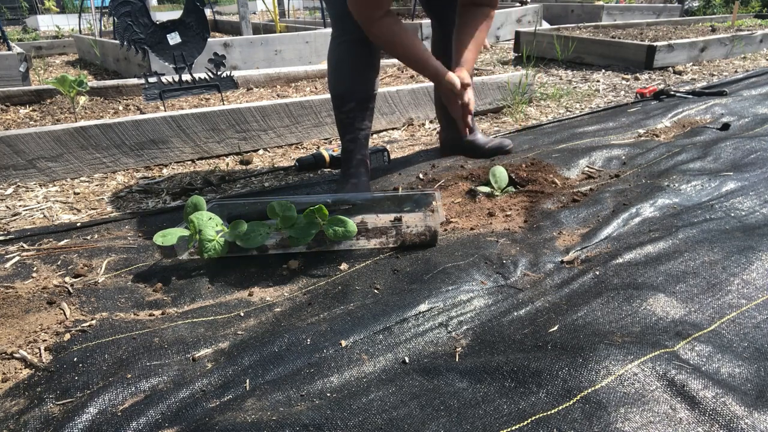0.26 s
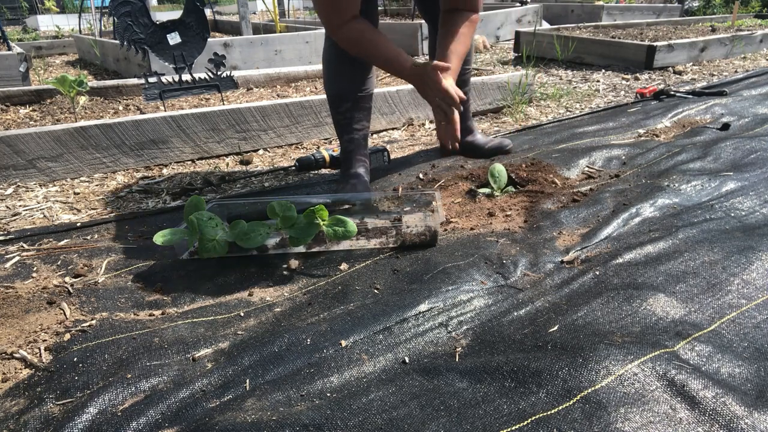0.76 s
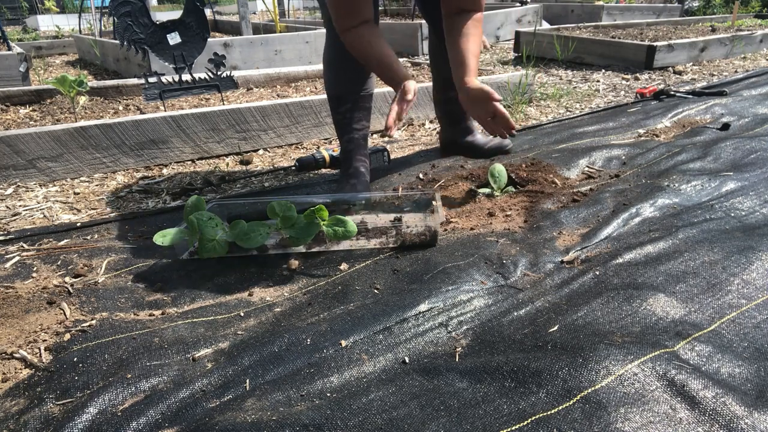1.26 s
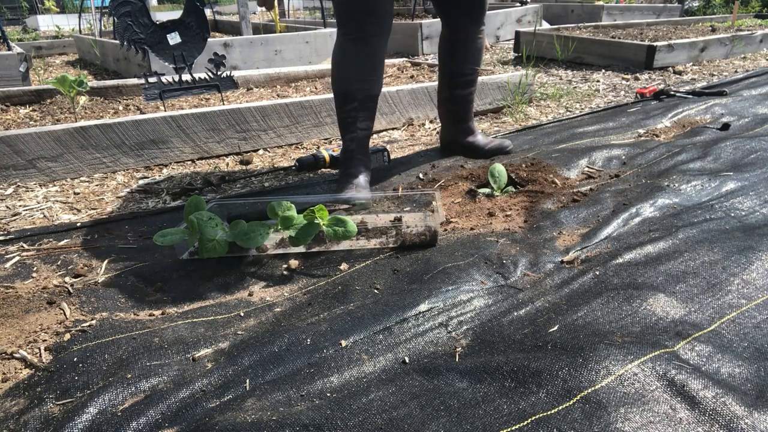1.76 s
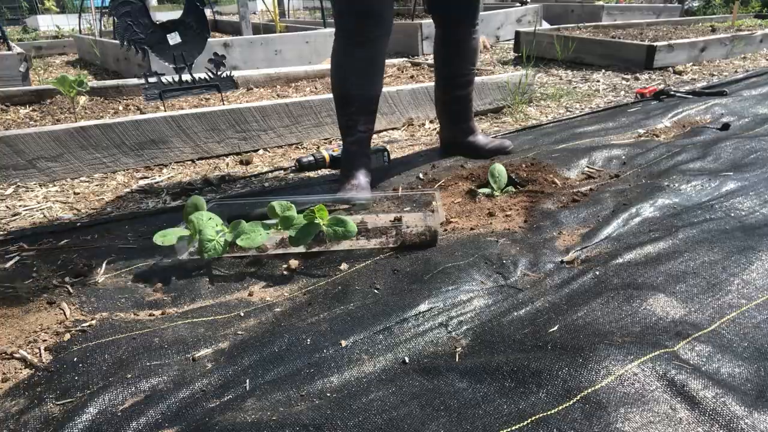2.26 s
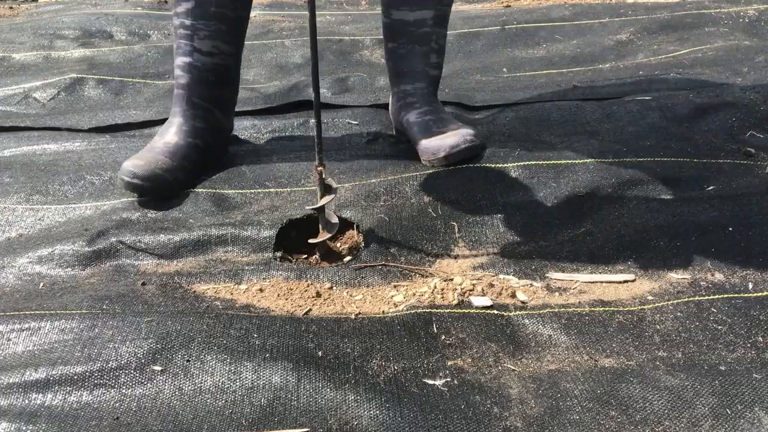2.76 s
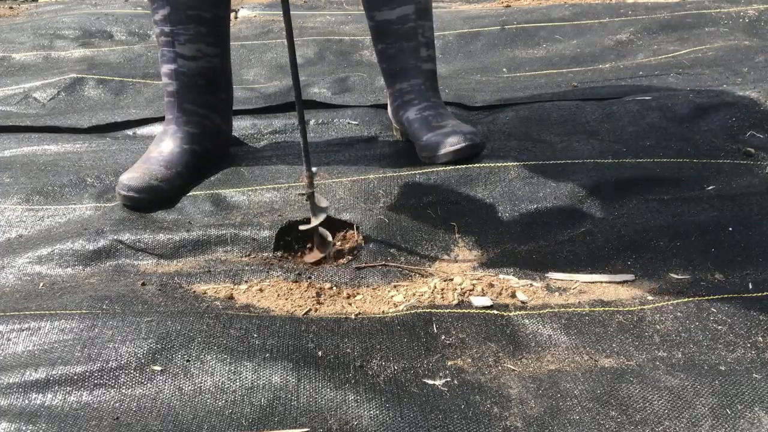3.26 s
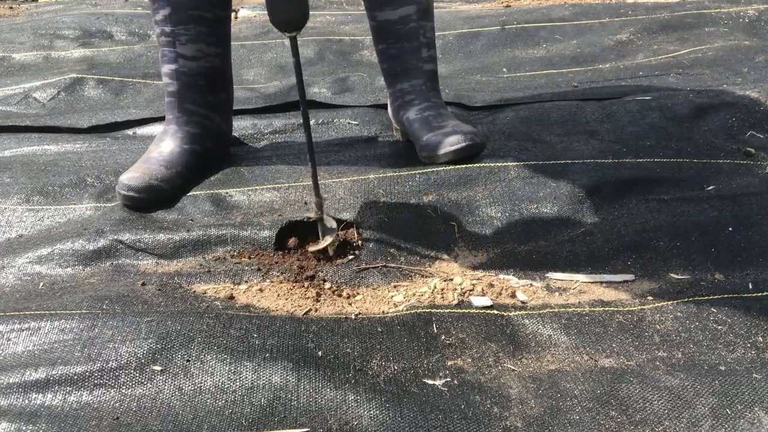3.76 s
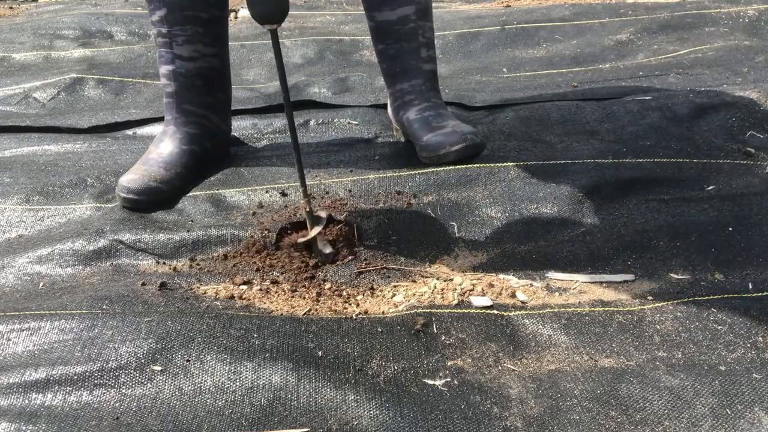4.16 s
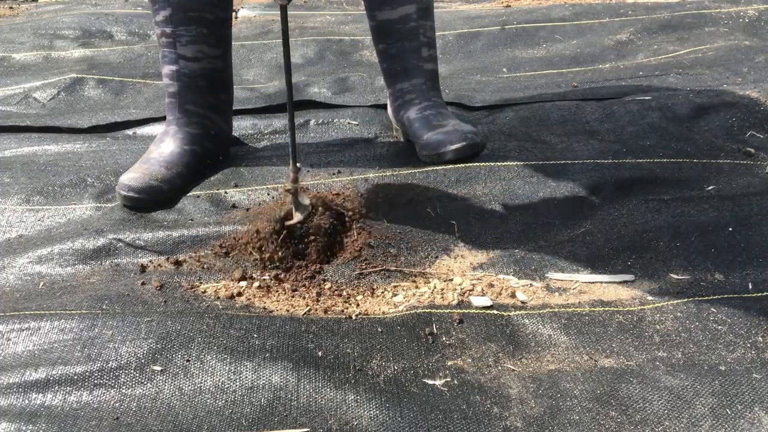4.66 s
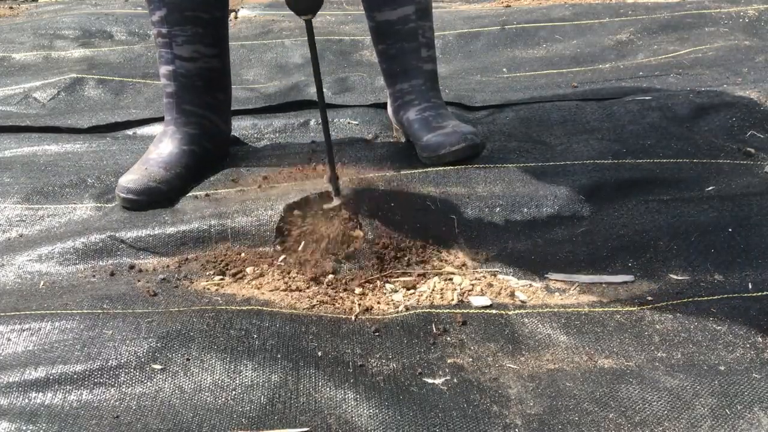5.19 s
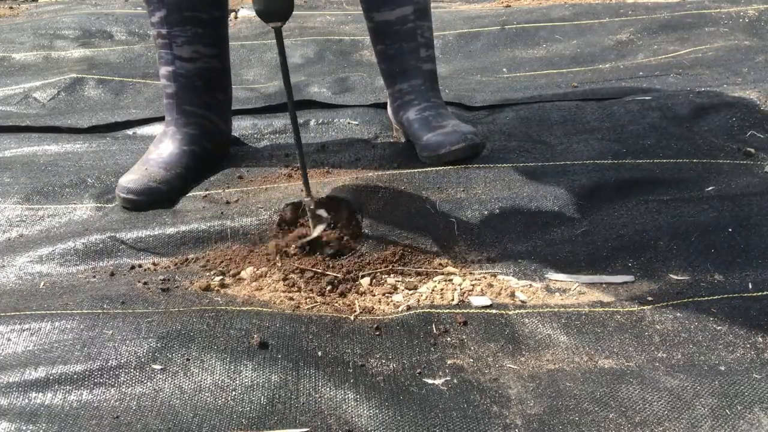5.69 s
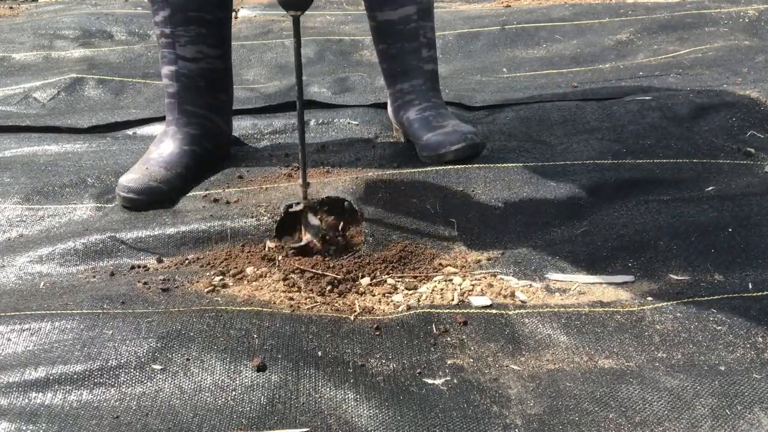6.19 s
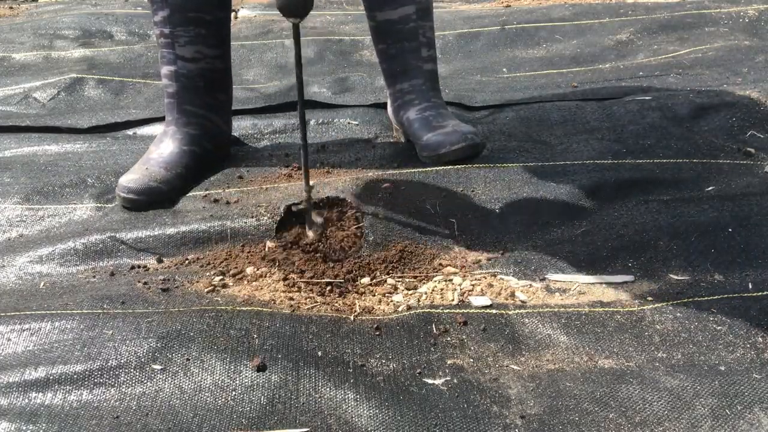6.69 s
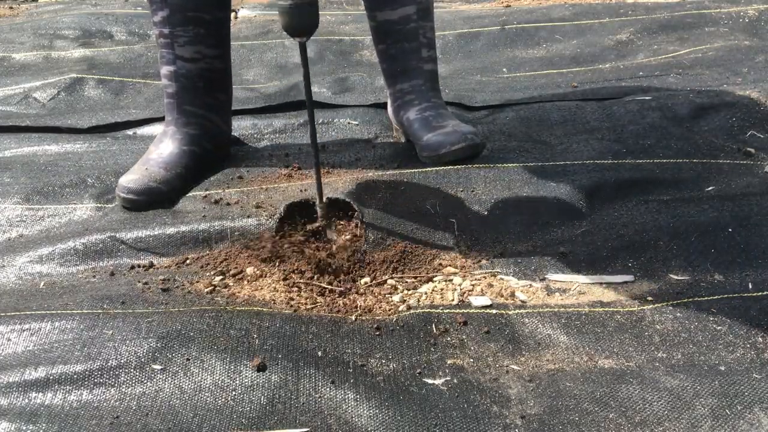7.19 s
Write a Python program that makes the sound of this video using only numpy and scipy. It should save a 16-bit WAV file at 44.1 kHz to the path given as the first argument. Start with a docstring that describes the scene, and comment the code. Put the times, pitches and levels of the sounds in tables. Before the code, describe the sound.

Quiet garden with far engine revs, gritty hand rubbing and one sharp clap, then a loud whining drill auger scrapes and clatters through stony ground.

```python
"""A cordless drill spins an auger through ground fabric into stony soil: shaft-locked tones whose whine sags
under load, filtered clicks for gear rattle and grinding, slip bursts for bites, pulses for stones and clods.
Before it, someone rubs soil off their hands (filtered grit strokes) and claps once (coloured pulses).
Behind: a far two-stroke engine revs (exhaust harmonics), a bird sings (gliding sines), the yard hushes (noise)."""
import sys
import numpy as np
from scipy import signal
from scipy.fft import rfft, irfft
from scipy.io import wavfile
from scipy.ndimage import uniform_filter1d

SR = 44100
rng = np.random.default_rng(int(sys.argv[2]) if len(sys.argv) > 2 else 0)


def store_pcm(level_fs):
    """Save levels as 16-bit WAV."""
    pcm = np.round(np.clip(level_fs, -1, 1) * 32767).astype(np.int16)
    wavfile.write(sys.argv[1], SR, np.atleast_2d(pcm).T)


N = 328104
T = np.arange(N) / SR
HZ = np.fft.rfftfreq(N, 1 / SR)


def amp(db):
    """Decibels to gain."""
    return 10 ** (np.asarray(db) / 20)


def unit(x):
    """Scales to rms 1."""
    return x / np.sqrt(np.mean(x ** 2) + 1e-20)


def read(points, hz):
    """A spectrum's dB at these frequencies, interpolated on a log axis."""
    point_hz, db = np.transpose(points)
    return np.interp(np.log(hz + 1), np.log(point_hz + 1), db)


def curves(rows):
    """Each column of a timed table, at every sample."""
    time_s, *columns = np.transpose(rows)
    return [np.interp(T, time_s, column) for column in columns]


def add(mix, start_s, sound):
    """Lays a sound into the mix at its start time."""
    part = mix[max(round(start_s * SR), 0):][:len(sound)]
    part += sound[:len(part)]


def ramp(start_s, rise_s):
    """Rises from 0 to 1, starting at start_s."""
    return np.clip((T - start_s) / rise_s, 0, 1)


def lag(x, seconds):
    """Follows x with this time constant, starting at its first value."""
    r = np.exp(-1 / (seconds * SR))
    return x[0] + signal.lfilter([1 - r], [1, -r], x - x[0])


def wander(rate_hz):
    """Smooth chance of rms 1, up to about this rate."""
    count = N // 32 + 1
    hz = np.fft.rfftfreq(count, T[-1] / count)
    spectrum = rfft(rng.standard_normal(count)) / (1 + (hz / rate_hz) ** 4)
    slow = unit(irfft(spectrum, count))
    return np.interp(T, np.linspace(0, T[-1], count), slow)


def colour(x, db):
    """Minimum-phase filter with this gain shape on the HZ grid; white noise keeps its power."""
    log_gain = np.log(unit(amp(db)))
    mirrored = np.r_[log_gain, log_gain[-2:0:-1]]
    phase = -signal.hilbert(mirrored).imag[:len(HZ)]
    taps = irfft(np.exp(log_gain + 1j * phase))[:4096]
    return signal.oaconvolve(x, taps)[:len(x)]


def resonate(x, hz, width_hz):
    """A resonance of gain 1 that may follow a frequency curve."""
    turn = np.exp(2j * np.pi * np.cumsum(hz * np.ones(len(x))) / SR)
    r = np.exp(-np.pi * width_hz / SR)
    return 2 * (turn * signal.lfilter([1 - r], [1, -r], x / turn)).real


def hiss_band(hz, width_hz):
    """A narrow band of noise, rms 1, that may follow a frequency curve."""
    noise = rng.standard_normal(N)
    return unit(resonate(resonate(noise, hz, width_hz), hz, width_hz))


def grains(per_s, spread_db):
    """Random clicks of rms 1, most small and a few large."""
    size = amp(spread_db * np.minimum(rng.exponential(1, N), 4))
    sign = rng.choice([-1, 1], N)
    return unit(size * sign * (rng.random(N) < per_s / SR))


def clicks(rows, spectrum, fuzz):
    """Blows (start_s, peak_db, t60_s): a sharp pulse and a short rough tail, in one colour."""
    out, t = np.zeros(N), np.arange(4096) / SR
    for start_s, peak_db, t60_s in rows:
        tail = fuzz * rng.standard_normal(len(t)) * amp(-60 * t / t60_s)
        add(out, start_s, amp(peak_db) * ((t == 0) + tail))
    pulse = colour(1. * (t == 0), read(spectrum, HZ))
    return colour(out, read(spectrum, HZ)) / abs(pulse).max()


def whistles(rows, blur_rad):
    """Short gliding tones with an unsteady phase."""
    out, jitter = np.zeros(N), blur_rad * wander(250)
    for start_s, length_s, start_hz, end_hz, level_db in rows:
        u = np.linspace(0, 1, int(length_s * SR))
        glide_hz = start_hz + u * (end_hz - start_hz)
        phase = 2 * np.pi * np.cumsum(glide_hz) / SR + jitter[int(start_s * SR):][:len(u)]
        add(out, start_s, amp(level_db) * np.sqrt(2) * np.sin(np.pi * u) * np.sin(phase))
    return out


def scatter(x, wet_db, t60_s):
    """Raised beds and fences throw back a faint, short tail."""
    t = np.arange(SR // 3) / SR
    tail = rng.standard_normal(len(t)) * amp(-60 * t / t60_s) * (t > .006)
    return x + amp(wet_db) * signal.oaconvolve(x, tail / np.linalg.norm(tail))[:N]


# outdoor hush spectrum: freq_hz, relative_db_per_hz
YARD_SPECTRUM = [(25, -19.5), (45, -12), (65, -6), (105, -0.5), (170, -5.5), (280, -7), (420, -9.5),
                 (620, -14), (850, -11.5), (1350, -10.5), (2500, -17), (4500, -18.5), (7500, -25),
                 (8600, -30.5), (15500, -33.5)]
YARD_DB = -51


def yard():
    """The steady outdoor hush: coloured noise, swelling a little."""
    hush = unit(colour(rng.standard_normal(N), read(YARD_SPECTRUM, HZ)))
    return amp(YARD_DB + 1.3 * wander(4.6)) * hush


# throttle openings: start_s, length_s, target_firing_hz, target_level_db
THROTTLE = [(0.029, 0.53, 193, -47), (0.708, .18, 192, -46), (1.035, .22, 181, -47), (1.39, 0.61, 187, -47)]
# exhaust gain by harmonic frequency: freq_hz, gain_db
EXHAUST_GAIN = [(120, -6), (175, -1.5), (230, -9), (285, 0.5), (325, -12.5), (370, -8.5), (480, -42),
                (700, -21), (900, -24), (1300, -28)]
IDLE_HZ, IDLE_DB = 104.3, -62  # firing rate and level with the throttle shut
FLYWHEEL_S, EXHAUST_LAG_S = .16, .035  # lags of speed and loudness behind the throttle


def far_engine():
    """Speed and loudness chase the throttle; only the low exhaust harmonics carry across the gardens."""
    aim_hz, push = np.full(N, float(IDLE_HZ)), np.full(N, amp(IDLE_DB))
    for start_s, length_s, target_hz, target_db in THROTTLE:
        is_open = (T > start_s) & (T < start_s + length_s)
        aim_hz[is_open], push[is_open] = target_hz, amp(target_db)
    firing_hz = lag(aim_hz, FLYWHEEL_S)
    turn = 2 * np.pi * np.cumsum(firing_hz * (1 + 0.005 * wander(25))) / SR
    stack = np.zeros(N)
    for k in range(1, 8):
        # moving air fades each harmonic on its own
        gain_db = read(EXHAUST_GAIN, k * firing_hz) + 1.5 * wander(10)
        stack += amp(gain_db) * np.sin(k * turn)
    return np.sqrt(2) * lag(push, EXHAUST_LAG_S) * stack


# bird notes: start_s, length_s, start_hz, end_hz, level_db (before BIRD_TRIM_DB)
BIRD_NOTES = [(1.229, 0.11, 4300, 4900, -66), (1.649, 0.045, 4470, 4040, -60),
              (1.86, 0.047, 4270, 5460, -64), (1.93, 0.066, 4200, 4980, -54),
              (2.05, 0.078, 4400, 5970, -55), (2.12, .08, 6060, 3900, -51), (2.26, 0.11, 4600, 3200, -53),
              (2.5, 0.087, 5870, 4300, -55)]
BIRD_TRIM_DB = -5


def bird():
    """Each note is one gliding, slightly blurred sine."""
    return amp(BIRD_TRIM_DB) * whistles(BIRD_NOTES, blur_rad=0.75)


# palms slide over each other: start_s, length_s, level_db, hollow_hz
PALM_RUBS = [(.35, 0.11, -51, 4500), (0.456, 0.062, -42.5, 3900), (0.517, 0.049, -54, 4000),
             (0.568, 0.058, -41.5, 3650), (0.619, 0.042, -44, 2880), (0.668, .1, -44, 2700),
             (0.783, .095, -45, 3440), (0.886, .09, -41.5, 2600), (0.992, 0.12, -43, 2810)]
# rub spectrum: freq_hz, relative_db_per_hz
SKIN_SPECTRUM = [(300, -24), (1500, -9), (2500, -5), (4000, -1.5), (7500, -2), (9000, -5.5), (15500, -6)]
# palms meet: start_s, peak_db, t60_s
PALM_CLAPS = [(.343, -31, 0.027), (1.445, -11.5, 0.018), (1.4473, 6.5, 0.0043), (1.4515, -14, .014),
              (1.516, -40, 0.027)]
# clap spectrum: freq_hz, relative_db_per_hz
CLAP_SPECTRUM = [(100, -37), (280, 0.5), (480, -7), (750, -9.5), (1300, -3), (1950, 3), (2400, -5),
                 (2750, 1.5), (3450, -7), (3850, -2), (4750, -17), (5500, -8), (6100, -17), (7250, -4.5),
                 (8580, -16), (15500, -27.5)]


def hands():
    """Gritty palms hiss unevenly through the hollow between them, then clap."""
    hiss, grit = np.zeros(N), grains(9000, 1.5) * amp(2.2 * wander(70))
    for start_s, length_s, level_db, hollow_hz in PALM_RUBS:
        n = int(length_s * SR)
        swell = np.sin(np.pi * np.arange(n) / n) ** 0.74
        stroke = grit[int(start_s * SR):][:n] * swell
        add(hiss, start_s, amp(level_db) * (stroke + 0.75 * resonate(stroke, hollow_hz, 450)))
    claps = clicks(PALM_CLAPS, CLAP_SPECTRUM, fuzz=.3)
    return colour(hiss, read(SKIN_SPECTRUM, HZ)) + claps


# drill speed heard as gear whine: time_s, whine_hz, whine_db, octave_db (levels before trims and load)
MOTOR_CURVE = [(2.95, 3021, -29, -46), (2.97, 2936, -54, -49), (3.25, 3057, -25.5, -36),
               (3.82, 2927, -26, -38), (3.87, 2653, -23, -29), (4.07, 2782, -28, -32),
               (4.15, 2735, -21, -22.5), (4.45, 2568, -19, -23.5), (4.96, 2701, -27.5, -47),
               (4.99, 2684, -13.5, -28), (5.18, 2495, -17, -35), (5.48, 2591, -23.5, -25),
               (5.84, 2562, -20, -26), (6.34, 2688, -25.5, -39), (6.39, 2787, -31, -42),
               (6.49, 2685, -22.5, -46), (6.64, 2344, -24, -26), (6.85, 2673, -25, -50),
               (6.99, 2736, -22, -24), (7.1, 2520, -20.5, -32), (7.31, 2730, -36, -27),
               (7.44, 2660, -20, -28)]
FREE_HZ, LOADED_HZ = 3050, 2540  # whine at no load and at full load


def load():
    """How hard the drill works, read from the sag of its speed: 0 free, 1 at full load."""
    return np.clip((FREE_HZ - curves(MOTOR_CURVE)[0]) / (FREE_HZ - LOADED_HZ), 0, 1)


# the auger meets the ground; the drill is CLEAR_DB quieter before
TOUCH_S, TOUCH_RISE_S, CLEAR_DB = 2.847, 0.14, -27.5


def contact():
    """Gain that swells as the auger meets the ground."""
    return amp(CLEAR_DB * (1 - ramp(TOUCH_S, TOUCH_RISE_S)))


# soil thump spectrum, for clods and jolts: freq_hz, relative_db_per_hz
EARTH_SPECTRUM = [(25, -43), (60, -8), (130, 4), (260, -0.5), (450, 6), (700, -9), (2000, -34), (8000, -62)]
# stones click on the steel: start_s, peak_db
STONE_HITS = [(2.879, -13), (3.4493, 6), (3.8094, 0), (6.0026, 4), (6.095, -3), (6.3814, 2.5), (6.519, 6),
              (6.5353, 10), (7.188, 4), (7.4114, 2)]
# stone and grit spectrum: freq_hz, relative_db_per_hz
STONE_SPECTRUM = [(100, -41), (700, -12), (2500, 8.5), (5500, 5), (8000, 5), (15000, -5.5)]
# clods land on the fabric: start_s, peak_db
CLOD_HITS = [(5.235, -33), (5.289, -25.5), (5.345, -32), (5.41, -27)]
STONE_T60_S, CLOD_T60_S = .008, 0.036
GRIT_DB, GRIT_LOAD_DB = -40, 3  # level at no load, and what full load adds


def stones():
    """Stones click on the auger, and thrown grit and clods patter on the fabric."""
    hits = clicks([(s, db, STONE_T60_S) for s, db in STONE_HITS], STONE_SPECTRUM, fuzz=0.12)
    clods = clicks([(s, db, CLOD_T60_S) for s, db in CLOD_HITS], EARTH_SPECTRUM, fuzz=.15)
    grit = amp(GRIT_DB + GRIT_LOAD_DB * load()) * colour(grains(120, 1.2), read(STONE_SPECTRUM, HZ))
    return hits + clods + grit * contact() * (T > TOUCH_S)


# steel against stone: start_s, length_s, start_hz, end_hz, level_db
STEEL_SQUEALS = [(2.952, 0.063, 2244, 4150, -21.5), (4.97, 0.17, 3070, 2940, -23),
                 (6.09, 0.01, 12300, 12100, -16.5)]


def squeals():
    """The steel squeals briefly against a stone: gliding, blurred sines."""
    return whistles(STEEL_SQUEALS, blur_rad=0.57)


# the flight catches on stones and fabric: start_s, length_s, scrape_db, thud_db
FLIGHT_BITES = [(2.809, .008, -31, -34), (2.891, 0.0054, -21, -31), (3.798, 0.036, -17.5, -24),
                (3.87, 0.032, -21, -24), (3.95, 0.042, -23, -43), (4.204, 0.026, -20.5, -40),
                (4.258, 0.023, -23, -38), (4.313, .029, -17, -35), (5.84, 0.04, -31, -25.5),
                (5.891, .021, -14.5, -21.5), (5.94, .015, -15, -19.5), (6.051, .02, -17.5, -28.5),
                (6.457, 0.0099, -12, -23), (6.47, 0.037, -19.5, -23), (6.516, .022, -9, -16),
                (6.704, .02, -8, -14), (6.928, .007, -11, -19.5), (6.936, .014, -7.5, -16.5),
                (7.2, 0.0057, -21, -13), (7.219, 0.017, -14.5, -21), (7.379, .021, -16.5, -27),
                (7.394, 0.0072, -6.5, -11.5), (7.425, .021, -10.5, -17)]
# scrape spectrum: freq_hz, relative_db_per_hz
SCRAPE_SPECTRUM = [(30, -35), (80, -20), (400, -8.5), (600, -19), (1500, 5.5), (2200, 0), (2750, 6),
                   (3400, -7), (5300, -3.5), (7500, -12), (9000, -18), (15000, -16)]
HOLE_HZ, HOLE_WIDTH_HZ = 918, 410  # ring of the hole
JOLT_DB, JOLT_T60_S = -6.5, 0.069  # jolt peak re the thud, and decay


def bites():
    """Each catch is a burst of slips that scrapes the steel, thumps the hole and jolts the ground."""
    scrape, thud, slips = np.zeros(N), np.zeros(N), grains(3500, 1.9)
    jolts = []
    for start_s, length_s, scrape_db, thud_db in FLIGHT_BITES:
        n = int(length_s * SR)
        slip = unit(slips[int(start_s * SR) - n:][:n]) * signal.windows.tukey(n, .4)
        burst = np.pad(slip, (0, 1024))  # room for the ring
        ring = resonate(resonate(burst, HOLE_HZ, HOLE_WIDTH_HZ), HOLE_HZ, HOLE_WIDTH_HZ)
        add(scrape, start_s, amp(scrape_db) * burst)
        add(thud, start_s, amp(thud_db) * ring * np.std(burst) / np.std(ring))
        jolts.append((start_s + length_s / 2, thud_db + JOLT_DB, JOLT_T60_S))
    return colour(scrape, read(SCRAPE_SPECTRUM, HZ)) + thud + clicks(jolts, EARTH_SPECTRUM, fuzz=0.088)


SLOTS = 9  # whine cycles per shaft turn
GEAR_RATIO = 19  # shaft turns per auger turn
FADE_IN_S, FADE_IN_RISE_S = 2.682, .11  # the drill, its shaft already at speed, fades in
DIG_S, DIG_RISE_S = 3.78, 0.12  # flight breaks through the fabric and digs in
# with slack gears, each auger turn swings the speed (share) and, in the soil, the whine level
SLACK_WOBBLE, SLACK_FLUTTER_DB = 0.0097, 4.5


def whine(mesh, shaft, auger, effort, digging):
    """Gear mesh tone and its octave, roughened by backlash."""
    _, whine_db, octave_db = curves(MOTOR_CURVE)
    once_per_turn = 1 + 0.15 * np.sin(shaft)
    tone = amp(whine_db + 0.73) * np.sin(mesh) * amp(1.9 * wander(83.0)) * once_per_turn
    octave = np.sin(2 * mesh + 0.32 * wander(90)) * amp(2.0 * wander(120.4))
    tone += amp(octave_db + 0.3) * octave
    return tone * amp(SLACK_FLUTTER_DB * digging * np.sqrt(1 - effort) * (auger - 0.9))


# shaft and gear tones: shaft_multiple, free_db, digging_db (both re the gear rattle)
SHAFT_TONES = [(2.704, -47, -23), (9.8, -28, -25), (11.65, -33, -36), (13.02, -35, -29), (15.74, -28, -24),
               (21, -31, -29), (24.6, -20, -30), (27.4, -20, -33), (30.1, -33, -38), (36.4, -31, -44)]
# gear tones that sing out for a while: start_s, length_s, shaft_multiple, level_db
SINGING_GEARS = [(3.104, 0.49, 10, -29.5), (4.545, 0.39, 31, -31), (4.75, .8, 5.25, -29.5),
                 (4.949, .3, 27, -39), (6.85, 0.6, 11.65, -27.5)]


def gear_tones(shaft, rattle_db, digging):
    """Sines locked to multiples of the shaft rate, each wavering in level and phase."""
    tones = np.zeros(N)
    for k, free_db, dig_db in SHAFT_TONES:
        level_db = rattle_db + free_db + (dig_db - free_db) * digging + 2.35 * wander(5.9)
        tones += amp(level_db) * np.sin(k * shaft + 0.86 * wander(60))
    for start_s, length_s, k, level_db in SINGING_GEARS:
        swell = np.sqrt(np.maximum(1 - (2 * (T - start_s) / length_s - 1) ** 2, 0))
        tones += amp(level_db) * swell * np.sin(k * shaft + 0.42 * wander(38))
    return tones


# gear rattle spectrum: freq_hz, relative_db_per_hz
RATTLE_SPECTRUM = [(40, -58), (900, -25.5), (1800, -10.5), (2400, 1.5), (3300, -1), (5000, -1.5),
                   (7900, -5), (8300, -5.5), (11000, -8.5), (15800, -6)]
# case resonances: freq_hz, width_hz, gain_db
CASE_RESONANCES = [(2490, 770, 3), (2960, 250, 5.5), (3776, 340, 6), (4330, 240, 6.5), (5080, 250, 2),
                   (6150, 640, 3.5), (7200, 540, 5), (7860, 150, 9), (9460, 460, 3), (11100, 710, 3.5)]
RATTLE_DB, RATTLE_LOAD_DB = -19.5, 3  # level at no load, and what full load adds
CHATTER_DB, GROWL_ORDER = -30, 2.96  # slack-gear chatter, and its growl as a shaft multiple


def gear_noise(whine_hz, shaft_hz, shaft, rattle_db, digging):
    """Tooth clicks ring the case; slack gears chatter and growl until the auger digs in."""
    case_db = read(RATTLE_SPECTRUM, HZ)
    for hz, width_hz, gain_db in CASE_RESONANCES:
        case_db = case_db + gain_db / (1 + (2 * (HZ - hz) / width_hz) ** 2)
    rattle = unit(colour(grains(9000, 0.59) * (1 + 0.16 * np.sin(shaft)), case_db))
    # while digging, tooth noise gathers round the upper multiples of the whine
    teeth = sum(amp(db) * hiss_band(k * whine_hz, 210) for k, db in [(2, -27), (3, -21.5), (4, -20.0)])
    chatter = hiss_band(GROWL_ORDER * shaft_hz, 160) + amp(-4.5) * hiss_band(whine_hz, 140)
    for hz, db in [(1380, 0.5), (4150, -15), (5150, -7), (6000, -12)]:
        chatter += amp(db) * hiss_band(hz, 330)
    return amp(rattle_db) * (rattle + digging * teeth) + amp(CHATTER_DB) * (1 - digging) * chatter


# grind spectrum: freq_hz, relative_db_per_hz
GRIND_SPECTRUM = [(40, -60), (500, -19.5), (620, -11), (780, -6.5), (1080, -1), (1230, -2), (1550, 3),
                  (2000, -2.5), (2800, -26), (6000, -35.5)]
GRIND_DB, GRIND_LOAD_DB = -28, 4  # level at no load, and what full load adds


def soil_grind(effort):
    """The flight grinds in the soil: dense coloured clicks, louder under load."""
    grind = unit(colour(grains(3500, 2.56), read(GRIND_SPECTRUM, HZ)))
    return amp(GRIND_DB + GRIND_LOAD_DB * effort) * grind


# rumble spectrum: freq_hz, relative_db_per_hz
RUMBLE_SPECTRUM = [(20, -37), (40, -15), (65, -3), (110, -6), (220, -5.5), (370, 3.5), (480, 2),
                   (600, -7.5), (1000, -10), (3000, -72)]
RUMBLE_DB, RUMBLE_LOAD_DB = -42, 5.5  # level at no load, and what full load adds
CLEAR_RUMBLE_DB = -3.5  # drop before the auger meets the ground


def soil_rumble(effort):
    """The soil rumbles: uneven clicks coloured low, louder under load."""
    rumble = unit(colour(grains(1200, 6.5), read(RUMBLE_SPECTRUM, HZ)))
    clear = amp(CLEAR_RUMBLE_DB * (1 - ramp(TOUCH_S, TOUCH_RISE_S)))
    return clear * amp(RUMBLE_DB + RUMBLE_LOAD_DB * effort) * rumble


# motor unbalance: shaft_multiple, level_db
UNBALANCE = [(.5, -55.5), (1, -47.5)]


def motor_hum(shaft):
    """The motor's unbalance hums at low multiples of the shaft rate."""
    return sum(amp(db + 2.1 * wander(15)) * np.sin(k * shaft) for k, db in UNBALANCE)


def drill():
    """Motor tones on one wavering shaft, gear rattle in the case, and the flight grinding in the soil."""
    whine_hz = curves(MOTOR_CURVE)[0]
    effort, digging = load(), ramp(DIG_S, DIG_RISE_S)
    rattle_db = RATTLE_DB + RATTLE_LOAD_DB * effort
    shaft_hz = uniform_filter1d(whine_hz, size=2200) / SLOTS * (1 + 0.00278 * wander(43.2))
    auger = np.sin(2 * np.pi * np.cumsum(shaft_hz) / SR / GEAR_RATIO)
    shaft_hz = shaft_hz * (1 + SLACK_WOBBLE * (1 - effort) * auger)
    shaft = 2 * np.pi * np.cumsum(shaft_hz) / SR
    # load rises once per auger turn
    throb = amp(0.45 * auger + 0.79 * wander(48))
    # backlash shakes the mesh phase and lays a rough skirt round the whine
    mesh = SLOTS * shaft + .18 * wander(200)
    tones = whine(mesh, shaft, auger, effort, digging) + gear_tones(shaft, rattle_db, digging)
    noise = gear_noise(whine_hz, shaft_hz, shaft, rattle_db, digging) + soil_grind(effort)
    boring = contact() * throb * (np.sqrt(2) * tones + noise)
    running = ramp(FADE_IN_S, FADE_IN_RISE_S)
    return running * (boring + np.sqrt(2) * motor_hum(shaft) + soil_rumble(effort))


def scene():
    """Near sounds share a short tail; all sources sum to one signal on two equal channels."""
    digging = stones() + squeals() + bites() + drill()
    near = scatter(hands() + digging, wet_db=-19.0, t60_s=0.11)
    return np.tile(yard() + far_engine() + bird() + near, (2, 1))


CEILING_DB, RECOVERY_DB_PER_S, ATTACK_S = 2, 10.5, 0.0012
EDGE_HZ = 15880  # band limit


def record(dry):
    """A limiter ducks quickly on peaks over its ceiling and recovers slowly; then clip and low-pass."""
    over_db = np.maximum(20 * np.log10(abs(dry).max(0) + 1e-9) - CEILING_DB, 0)
    recovery_db = RECOVERY_DB_PER_S * T
    duck_db = np.maximum.accumulate(over_db + recovery_db) - recovery_db
    limited = np.clip(dry * amp(-lag(duck_db, ATTACK_S)), -1, 1)
    low_pass = signal.firwin(511, EDGE_HZ, window=("kaiser", 9), fs=SR)
    return signal.oaconvolve(limited, low_pass[None], "same")


dry = scene()
out = record(dry)
store_pcm(out)
```